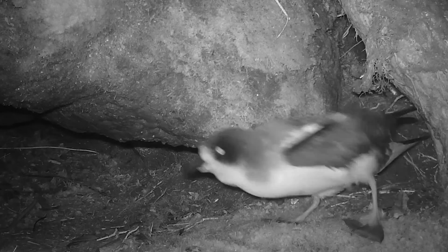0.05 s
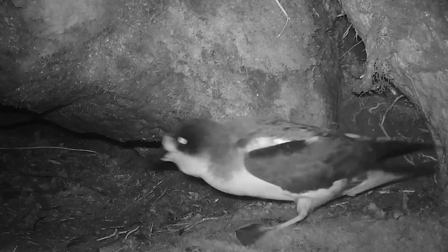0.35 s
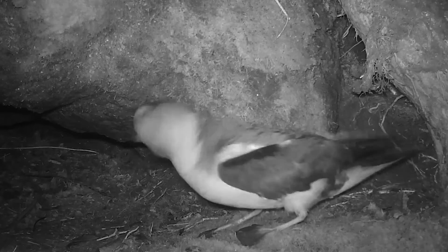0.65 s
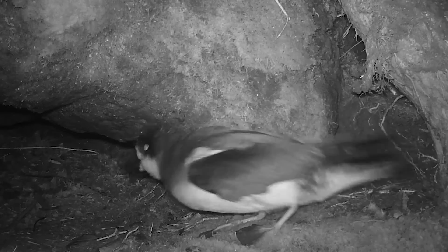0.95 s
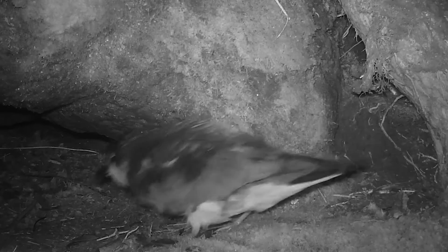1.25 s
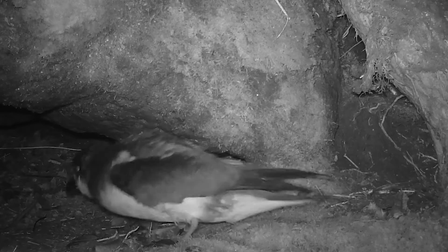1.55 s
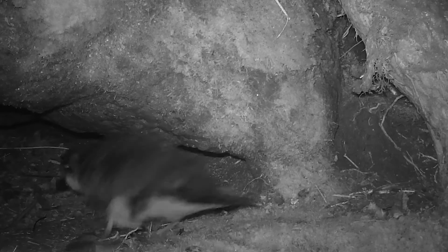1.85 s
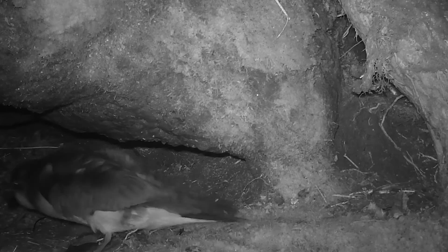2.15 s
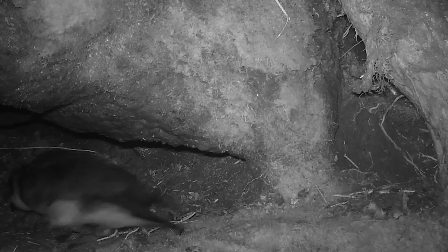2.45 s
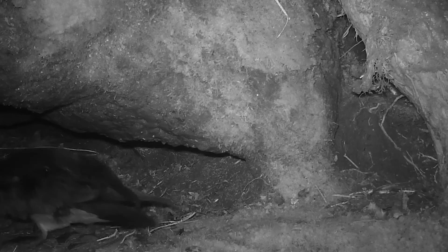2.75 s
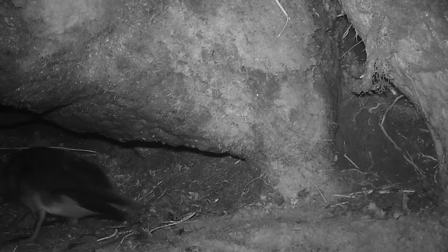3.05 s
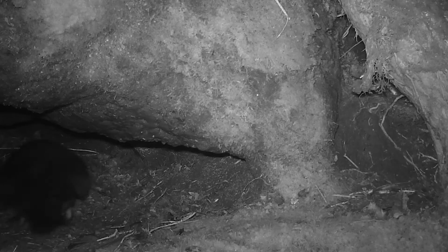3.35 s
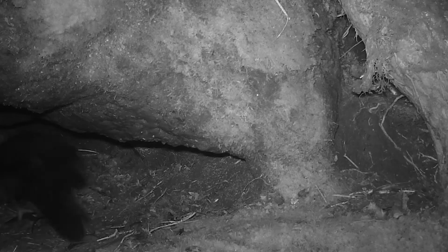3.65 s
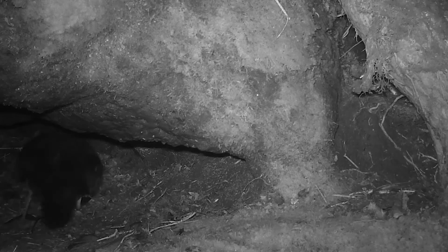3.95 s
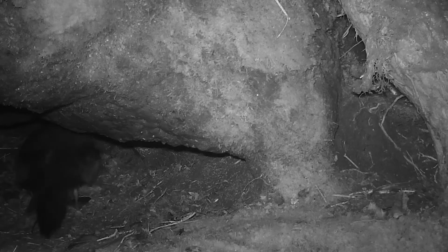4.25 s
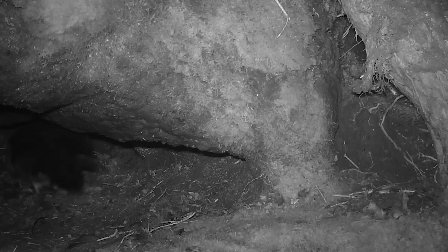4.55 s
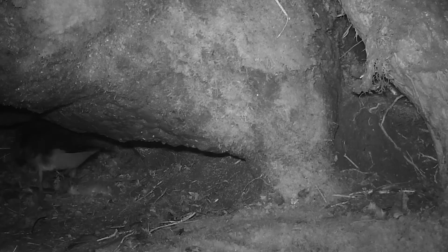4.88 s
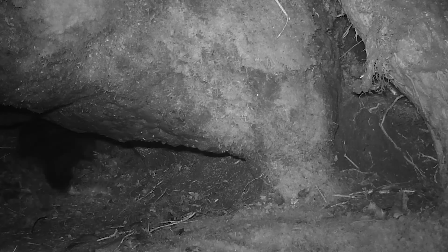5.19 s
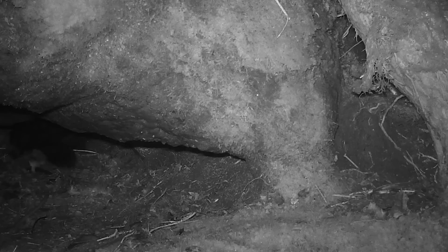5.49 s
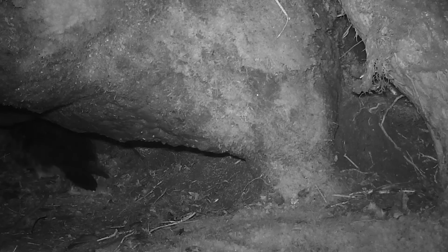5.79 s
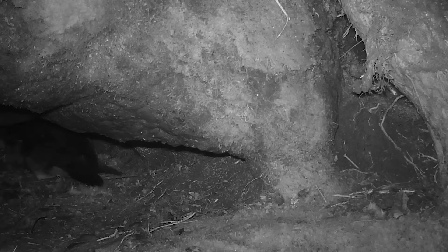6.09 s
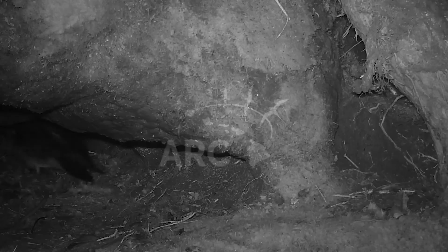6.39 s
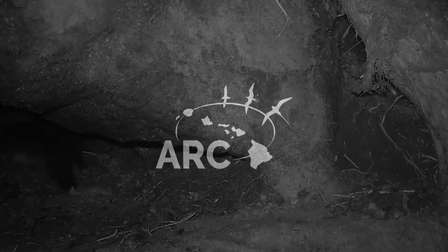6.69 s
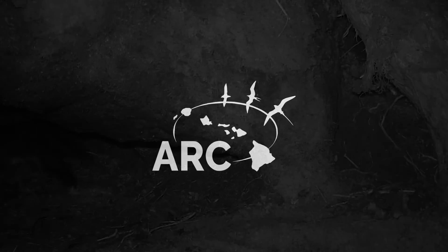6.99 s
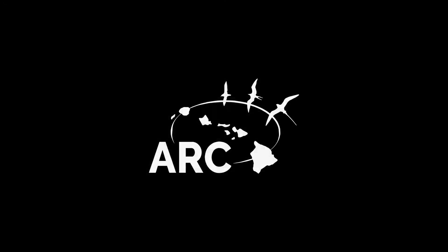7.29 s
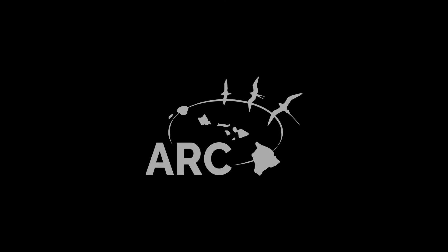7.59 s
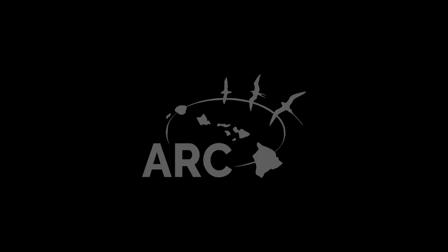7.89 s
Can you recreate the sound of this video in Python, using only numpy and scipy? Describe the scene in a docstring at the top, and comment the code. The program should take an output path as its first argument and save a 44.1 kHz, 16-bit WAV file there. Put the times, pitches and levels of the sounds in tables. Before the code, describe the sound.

A bird shuffles faintly over dry litter in a rock burrow, with sparse tiny twig snaps and rustles under a steady hiss.

```python
"""A seabird shuffles faintly over dry twigs and litter in a rock burrow.
Twigs snap and ring; feet and feathers drag out a fine crackle.
Lower knocks come from thicker sticks and from the contact click of one microphone bump.
Left: the bird and a few low bumps, through a hissy microphone that rings near 7 kHz.
Right: only sharp electrical ticks and electronic hiss. Both channels fade out at the end."""
import sys
import numpy as np
from scipy import signal
from scipy.fft import rfft, irfft
from scipy.io import wavfile

SR = 44100
rng = np.random.default_rng(int(sys.argv[2]) if len(sys.argv) > 2 else 0)


def master_out(mix):
    """Clip the mix to full scale and print it as 16-bit PCM to the path in sys.argv[1]."""
    frames = np.transpose(np.atleast_2d(mix))
    ceiling = np.clip(frames, -1, 1)
    pcm = np.round(ceiling * 32767).astype(np.int16)
    wavfile.write(sys.argv[1], SR, pcm)


N = 349713
TIME_S = np.arange(N) / SR

# twigs breaking underfoot: (time [s], level over 1 ms [dB], ring [Hz], decay [ms], ring width [Hz])
TWIG_SNAPS = [(.1062, -47, 7300, .5, 1700), (.509, -52.5, 7000, .8, 1700), (.5545, -52, 6500, 2, 1400),
              (.5605, -46.5, 7000, 2.5, 1700), (0.606, -54, 7100, 1, 1700), (.629, -51, 7000, 1.5, 1700),
              (0.9277, -44.5, 7100, 1.6, 1200), (0.993, -51, 6900, .8, 1400), (1.208, -54, 5800, .8, 1700),
              (1.2148, -58, 6500, 2, 1700), (1.256, -41.5, 6400, .7, 1200), (1.267, -52, 6400, 1.5, 1700),
              (1.2815, -50, 6700, 1.2, 1700), (1.4527, -50, 7100, 1.5, 1700),
              (1.548, -43.5, 7150, .9, 1700), (2.0911, -44, 6950, .6, 1400), (2.0948, -48, 7050, 1.7, 1100),
              (2.1036, -50, 7300, .5, 1700), (2.2002, -44, 5800, 6, 1090), (2.214, -47, 6900, 1.2, 1100),
              (2.2268, -54, 6800, 1.2, 1400), (2.4365, -48, 7100, .7, 1700), (2.7612, -40.5, 6500, 2, 1400),
              (3.026, -50.5, 7500, 1, 1700), (3.539, -51, 6700, 1.5, 1700), (3.6596, -44, 7240, 0.66, 2980),
              (3.8188, -38, 7000, .6, 1050), (3.8204, -41.5, 7000, 1, 1052), (4.4078, -53, 7300, 2, 1300),
              (4.4157, -45, 7200, .5, 850), (5.221, -47.5, 6600, 3, 1700), (5.8713, -46, 7600, 1, 1700),
              (5.907, -45, 8070, .7, 1600), (5.925, -34.5, 8430, .8, 650), (6.9098, -40, 6800, .3, 2000),
              (6.9126, -41.5, 6260, 6, 1300), (7.0565, -48, 7070, 1, 1700), (7.2626, -45, 6700, .8, 1700),
              (7.276, -44.5, 6770, .8, 1700), (7.3217, -47, 7000, 4, 1700)]
# lower knocks: thicker sticks, and the contact click of the microphone bump at 2.797 s:
# (time [s], level over 1 ms [dB], ring [Hz], decay [ms], ring width [Hz])
LOWER_KNOCKS = [(1.2558, -49, 4800, 0.9, 900), (1.5482, -56, 5300, .8, 900), (2.2232, -52, 3400, 6, 900),
                (2.7971, -50, 3000, .15, 1100), (3.8183, -48.5, 2850, .8, 500),
                (3.8187, -44, 5400, 1.2, 350), (5.111, -49.5, 2100, 7, 500), (6.909, -49, 4880, 1.5, 1300),
                (6.9096, -43, 2300, 5, 500), (6.909, -45.5, 1200, 6, 600)]
# feet and feathers in litter: (midpoint [s], length [s], level [dB])
LITTER_DRAGS = [(0.12, 0.25, -64), (0.302, 0.095, -66), (.46, 0.05, -61), (0.577, 0.13, -63.5),
                (1.015, 0.25, -62), (1.42, 0.15, -64.5), (1.56, 0.022, -59), (1.83, 0.14, -65),
                (2.215, 0.058, -57), (3.224, 0.031, -61), (3.973, 0.06, -66.5), (4.53, 0.05, -66),
                (5.038, 0.07, -65), (5.437, 0.043, -65), (5.85, 0.06, -68), (6.978, 0.17, -65),
                (7.36, 0.19, -62)]
# dry litter through the microphone: (frequency [Hz], relative level [dB])
LITTER_SPECTRUM = [(300, -18.5), (2700, -16.5), (4300, -15.5), (5500, -11), (6500, -2.5), (7400, -5.5),
                   (8400, -12.5), (9800, -20), (14000, -32.5)]
# bumps on the microphone: (time [s], gain [dB], rise [ms], decay [s], swing [Hz])
MIC_BUMPS = [(2.797, -22.5, 0.27, 0.012, 12), (3.085, -32, 3.2, 0.019, 15),
             (3.2213, -36.5, 2.7, 0.017, 111.4)]
# electrical spikes: (time [s], relative level [dB], centre [Hz], width [Hz])
ELECTRICAL_TICKS = [(2.5458, -27, 12500, 9000), (3.6768, -35, 1500, 9000), (4.4511, -20, 3200, 18100),
                    (4.5451, -21.5, 10700, 6960), (4.5448, -34, 3730, 1300), (5.6554, -27, 6500, 10000),
                    (5.8295, -27, 11300, 7000), (6.0905, -31.5, 2500, 11000), (7.0414, -23, 9500, 11000)]
# microphone channel noise: (frequency [Hz], density [dB re 1/Hz])
MIC_HISS_SPECTRUM = [(20, -66.5), (45, -70.5), (100, -78.5), (200, -84), (400, -88.5), (800, -93),
                     (1600, -97), (3000, -99.9), (4600, -101.6), (7000, -100.7), (9000, -102.9),
                     (11500, -104.3), (14500, -104.0)]
# idle channel noise: (frequency [Hz], density [dB re 1/Hz])
IDLE_HISS_SPECTRUM = [(20, -69.5), (45, -85.5), (75, -79), (110, -82), (150, -97), (220, -94), (500, -98),
                      (2000, -98), (7000, -100.2), (14500, -101.2)]


def twig_snaps(crack_db=-4, crack_ref_hz=1700):
    """Each twig cracks and rings at its own pitch; the purer the ring, the less crack."""
    out = np.zeros(N)
    for time_s, level_db, ring_hz, decay_ms, width_hz in TWIG_SNAPS:
        fracture = fibre_burst(decay_ms)
        tone = ring(ring(fracture, ring_hz, width_hz), ring_hz, width_hz)
        crack_gain = undb(crack_db) * width_hz / crack_ref_hz
        crack = crack_gain * unit_energy(colour(fracture, LITTER_SPECTRUM))
        add(out, time_s, at_level(unit_energy(tone) + crack, level_db))
    return out


def lower_knocks():
    """Thicker sticks and one microphone contact click, with one resonance each."""
    out = np.zeros(N)
    for time_s, level_db, ring_hz, decay_ms, width_hz in LOWER_KNOCKS:
        knock = ring(fibre_burst(decay_ms), ring_hz, width_hz)
        add(out, time_s, at_level(knock, level_db))
    return out


def fibre_burst(decay_ms, first_break=4, size=4096):
    """Fibres give way: one sharp break, then smaller ones dying out."""
    t_ms = np.arange(size) / SR * 1000
    small_breaks = rng.standard_normal(size) * np.exp(-t_ms / decay_ms)
    return first_break * signal.unit_impulse(size) + small_breaks


def litter_scuffs(grains_per_s=1600, scatter_db=2.5, stir_db=-69, retreat_db_per_s=2.0,
                  snap_stir_s=0.022, snap_stir_db=-24):
    """Litter grains swell at each drag and snap, over a stir that fades as the bird walks off."""
    power = undb(stir_db - retreat_db_per_s * TIME_S) ** 2
    for mid_s, length_s, level_db in LITTER_DRAGS:
        power += push_power(mid_s - length_s / 2, length_s, level_db)
    for time_s, level_db, *_ in TWIG_SNAPS:
        power += push_power(time_s, snap_stir_s, level_db + snap_stir_db)
    sizes = undb(scatter_db * np.minimum(rng.exponential(size=N), 4))
    onsets = rng.random(N) < grains_per_s / SR
    grains = onsets * sizes * rng.choice([-1, 1], N)
    crackle = colour(grains, LITTER_SPECTRUM)
    return crackle / crackle.std() * np.sqrt(power)


def push_power(start_s, length_s, mean_db, attack_share=0.36):
    """One push into the litter: power builds, then lets go."""
    corners_s = start_s + length_s * np.array([0, attack_share, 1])
    return np.interp(TIME_S, corners_s, [0, 2, 0]) * undb(mean_db) ** 2


def mic_bumps():
    """A sudden push on the microphone sags and swings back."""
    out, t_s = np.zeros(N), TIME_S[:SR // 4]
    for time_s, gain_db, rise_ms, decay_s, swing_hz in MIC_BUMPS:
        rise = 1 - np.exp(-t_s * 1000 / rise_ms)
        swing = np.exp(-t_s / decay_s) * np.cos(2 * np.pi * swing_hz * t_s)
        add(out, time_s, -undb(gain_db) * rise * swing)
    return out


def electrical_ticks(gain_db=1):
    """Brief spikes, from dull and full to thin and bright."""
    out = np.zeros(N)
    for time_s, level_db, centre_hz, width_hz in ELECTRICAL_TICKS:
        spike = ring(signal.unit_impulse(256), centre_hz, width_hz)
        add(out, time_s, unit_energy(spike) * undb(level_db + gain_db))
    return out


def input_hiss(spectrum):
    """Steady noise of an input stage, rising towards the bass."""
    gain = undb(curve_db(spectrum, N)) * np.sqrt(SR / 2)
    return irfft(rfft(rng.standard_normal(N)) * gain, N)


def ring(x, centre_hz, width_hz):
    """One resonance."""
    return signal.lfilter(*signal.iirpeak(centre_hz, centre_hz / width_hz, fs=SR), x)


def colour(x, spectrum, size=512):
    """Minimum-phase filter of unit energy with the given spectrum."""
    cepstrum = irfft(np.log(undb(curve_db(spectrum, size))))
    cepstrum[1:size // 2] *= 2
    cepstrum[size // 2 + 1:] = 0
    response = irfft(np.exp(rfft(cepstrum)))
    return signal.lfilter(unit_energy(response), 1, x)


def curve_db(spectrum, size):
    """Spectrum points interpolated onto FFT bins in log frequency."""
    points_hz, points_db = np.transpose(spectrum)
    bins_hz = np.arange(size // 2 + 1) * SR / size
    return np.interp(np.log(bins_hz + 1), np.log(points_hz), points_db)


def at_level(x, level_db):
    """Scale to the energy of 1 ms at this level."""
    return unit_energy(x) * undb(level_db) * np.sqrt(SR / 1000)


def unit_energy(x):
    """Scale to an energy of 1."""
    return x / np.sqrt(np.sum(x ** 2) + 1e-18)


def undb(db):
    """Decibels to gain."""
    return 10 ** (np.asarray(db) / 20)


def add(track, time_s, sound):
    """Mix a sound into a track."""
    start = int(time_s * SR)
    track[start:start + len(sound)] += sound[:N - start]


def scene():
    """Burrow left, bare electronics right."""
    burrow = twig_snaps() + lower_knocks() + litter_scuffs()
    left = burrow + mic_bumps() + input_hiss(MIC_HISS_SPECTRUM)
    right = electrical_ticks() + input_hiss(IDLE_HISS_SPECTRUM)
    return np.array([left, right])


def record(dry, dc_offset=(-.0393, -.0331), fade_span_s=(5.62, 7.6), cutoff_hz=15450):
    """DC offset per input, linear fade-out, steep low-pass."""
    biased = dry + np.array(dc_offset)[:, None]
    fade = np.interp(TIME_S, fade_span_s, [1, 0])
    low_pass = signal.ellip(8, .05, 50, cutoff_hz, fs=SR, output="sos")
    return signal.sosfiltfilt(low_pass, biased * fade)


dry = scene()
out = record(dry)
master_out(out)
```